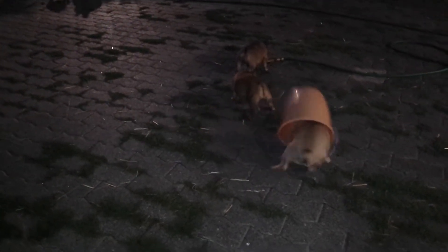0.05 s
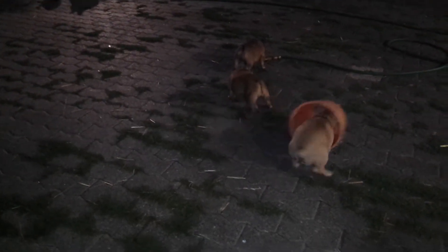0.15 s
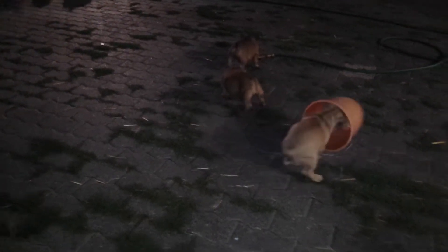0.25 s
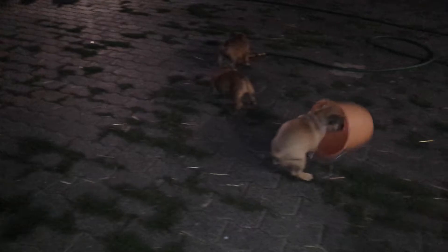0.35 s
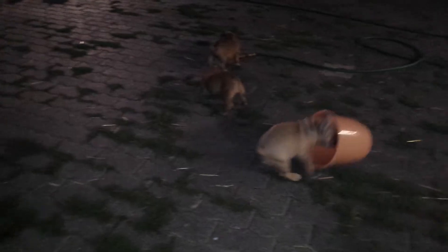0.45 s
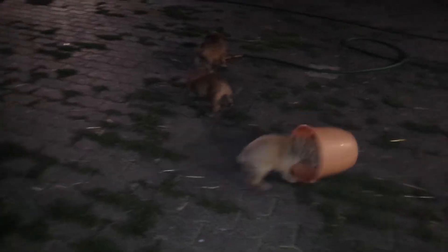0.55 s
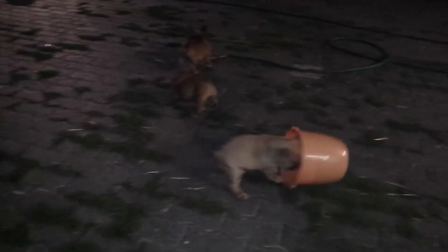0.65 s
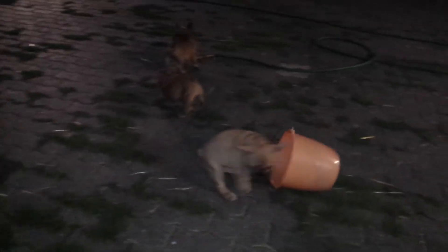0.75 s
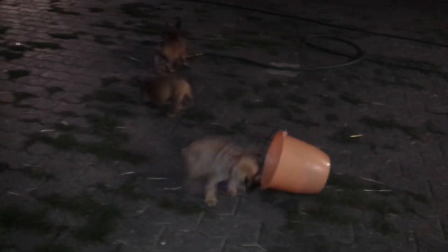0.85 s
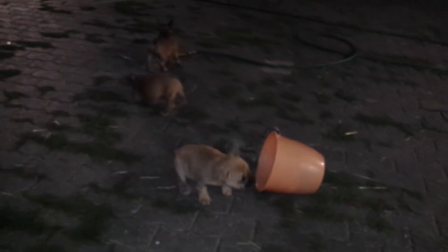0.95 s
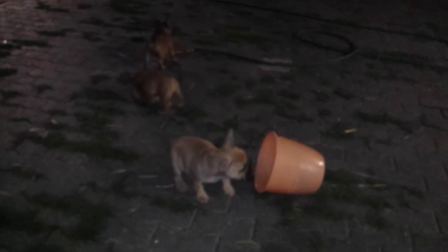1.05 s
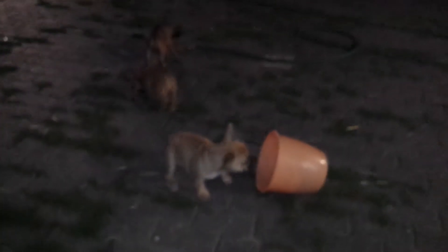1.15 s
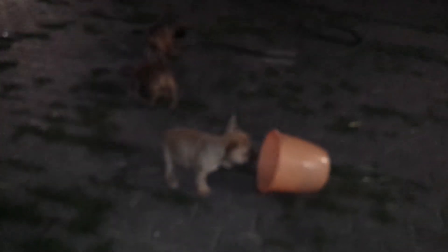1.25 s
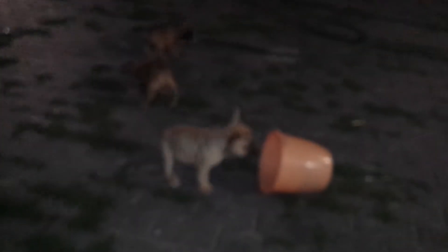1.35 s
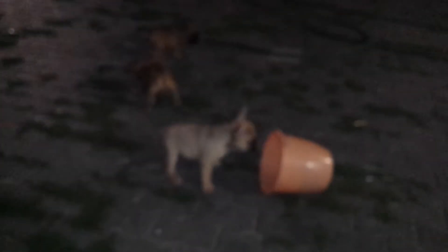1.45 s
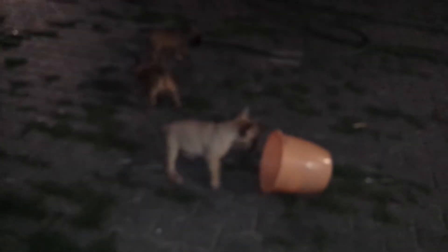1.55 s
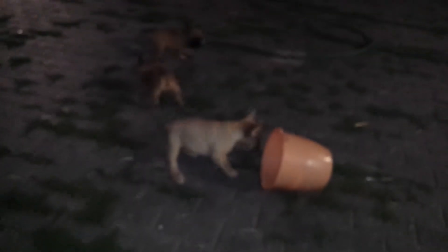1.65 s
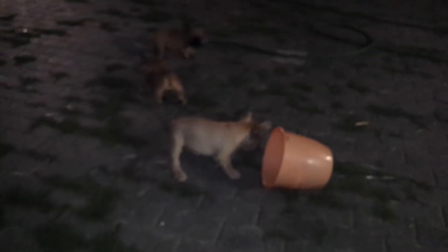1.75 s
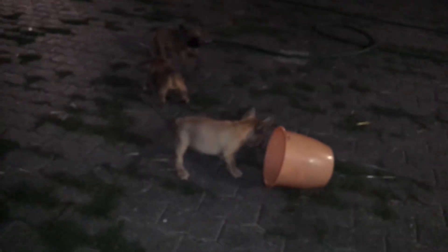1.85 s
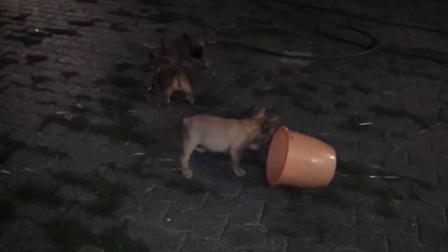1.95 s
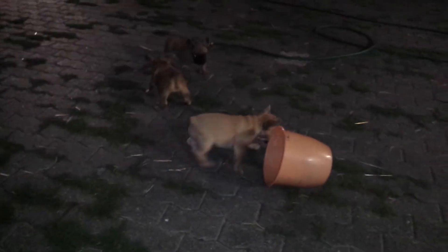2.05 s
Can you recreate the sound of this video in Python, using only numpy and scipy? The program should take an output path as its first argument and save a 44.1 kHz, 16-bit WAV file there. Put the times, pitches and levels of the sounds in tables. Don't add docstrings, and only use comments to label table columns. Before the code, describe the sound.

Plastic pot clattering on paving in a quiet night yard: hollow thumps and hard rattling knocks first, a brief scrape, a pause, a small tap and rocking, then faint paw scuffs over hum and hiss.

```python
import sys
import numpy as np
from scipy import signal
from scipy.fft import rfft, irfft
from scipy.io import wavfile

SR = 44100
rng = np.random.default_rng(int(sys.argv[2]) if len(sys.argv) > 2 else 0)


def how_loud(loudness_db):
    steps = np.asarray(loudness_db, float) / 20
    return 10 ** steps


def bounce(signal):
    frames = np.transpose(np.atleast_2d(signal))
    limited = np.clip(frames, -1, 1)
    pcm = np.round(limited * 32767).astype(np.int16)
    wavfile.write(sys.argv[1], SR, pcm)


N = 92610


def evened(x):
    return x / np.sqrt(np.mean(x ** 2) + 1e-20)


def unit(h):
    return h / np.linalg.norm(h)


def read(points, hz):
    f, value = np.transpose(points)
    return np.interp(np.log(hz + 1), np.log(f + 1), value)


def add(mix, start_s, sound):
    part = mix[round(start_s * SR):][:len(sound)]
    part += sound[:len(part)]


def colour(points):
    log_gain = read(points, np.fft.rfftfreq(2048, 1 / SR)) * np.log(10) / 20
    fold = np.r_[1, 2 * np.ones(1023), 1, np.zeros(1023)]
    cepstrum = irfft(log_gain) * fold
    return irfft(np.exp(rfft(cepstrum)))[:1024]


def ring(modes, tune=1, vary_db=0):
    t = np.arange(6000) / SR
    hz, db, t60_s = np.transpose(modes)[:, :, None]
    decay = how_loud(db + vary_db - 60 * t / t60_s)
    return (decay * np.sin(2 * np.pi * hz * tune * t)).sum(0)


def grit(count, per_s, spread_db):
    chance, side, size = rng.random((count, 3)).T
    height = how_loud(-spread_db * np.log(size + 0.0011))
    return evened((chance < per_s / SR) * np.sign(side - .5) * height)


# start in seconds, boom in dB, upper hollow modes in dB re boom,
# t60 in seconds, dull thud in dB.
LANDINGS = [(0.146, -26, -8.5, 0.26, -41), (0.2376, -1.5, -8, 0.15, -37), (0.299, -17.5, -4, 0.087, -42),
            (.349, -26, -2.5, 0.12, -38), (0.409, -28, -8, 0.07, -50), (0.438, -33.5, -4, 0.099, -42),
            (0.488, -6, -6, 0.17, -15), (0.517, -27, -8, 0.53, -32), (0.5787, -11, -5.5, 0.095, -4.5),
            (0.655, -26, 0, 0.19, -27), (.76, -28.5, -4, 0.084, -26), (0.726, -45.5, 8, 0.1, -26),
            (1.487, -34.5, -3, 0.096, -26)]
# frequency in Hz, level in dB, share of the landing's t60.
HOLLOW_MODES = [(202, 0, 1.0), (345, -6, 1.1), (390, 0, .95), (300, -13, .6), (160, -16, .5),
                (246, -13, .6)]
LOW_RISE_S, HIGH_RISE_S = 0.003, 0.0036
THUD_HZ, THUD_T60_S = 190, 0.023
CHOKE_S, CHOKE_DB_PER_S = .055, 600


def booms():
    out = np.zeros(N)
    t = np.arange(6000) / SR
    choke = how_loud(-CHOKE_DB_PER_S * np.maximum(t - CHOKE_S, 0))
    thud = np.convolve(ring([(THUD_HZ, 0, THUD_T60_S)]), np.hanning(70) / 35)
    for start_s, boom_db, upper_db, t60_s, thud_db in LANDINGS:
        modes = [(hz, db, t60_s * share) for hz, db, share in HOLLOW_MODES]
        low = ring([mode for mode in modes if mode[0] <= 280])
        high = ring([mode for mode in modes if mode[0] > 280])
        add(out, start_s, how_loud(boom_db) * choke * (1 - np.exp(-t / LOW_RISE_S)) * low)
        add(out, start_s, how_loud(boom_db + upper_db) * choke * (1 - np.exp(-t / HIGH_RISE_S)) * high)
        add(out, start_s, how_loud(thud_db) * thud)
    return out


# start in seconds, wall in dB, tick in dB, chatter length in seconds,
# brightest wall frequency in Hz.
CONTACTS = [(.124, -26, -25.5, 0.0063, 900), (.1275, -19.5, -47, 0.0028, 2480),
            (0.144, -25, -29, 0.0077, 2350), (0.152, -27, -48, 0.0058, 1120),
            (.167, -20, -61, 0.0052, 2380), (0.185, -42, -34, .006, 1000), (.202, -30, -48, 0.0089, 2200),
            (.2375, -21, -23, 0.0073, 1420), (0.265, -59, -33.5, 0.02, 800),
            (0.358, -27.5, -28, 0.0049, 1680), (0.402, -38, -44, 0.0073, 1120),
            (0.435, -40.5, -45, 0.006, 700), (0.4892, -13.5, -17, 0.0068, 1710),
            (0.511, -32, -40, 0.041, 2200), (.519, -25.5, -29.5, 0.03, 1000),
            (0.563, -24, -38, 0.0083, 1200), (0.5758, -30, -16, 0.0056, 2900),
            (0.6026, -21.5, -17.5, 0.013, 1510), (.607, -25, -35.5, 0.0062, 1110),
            (0.616, -42, -43, 0.0037, 900), (.639, -24, -48, 0.013, 1510), (.658, -27, -40, 0.012, 1170),
            (0.743, -34, -43, 0.0029, 1060), (.75, -24, -32.5, 0.0057, 1220),
            (0.76, -21, -24, 0.0083, 1000), (0.801, -24, -49, 0.0048, 850), (0.806, -28, -55, 0.0048, 1000),
            (0.8174, -19, -27.5, 0.0074, 1120), (0.821, -16, -37, 0.0022, 900),
            (.833, -33, -34, 0.011, 1330), (1.403, -49, -67, 0.0055, 895),
            (1.4878, -27.5, -31, 0.0091, 1270), (1.508, -38, -39, .006, 1500)]
# frequency in Hz, level in dB, t60 in seconds.
WALL_MODES = [(660, -4, .04), (755, 0, .05), (860, -2, .04), (1000, -1, .04), (1150, -1, .045),
              (1530, -1, .035), (1640, -1, .035), (1860, -4, .03), (2340, -5, .05), (2560, -7, .025),
              (3220, -10, .02), (3950, -15, .02), (5000, -13, .015)]
# frequency in Hz, level in dB.
TICK_SPECTRUM = [(800, -43.5), (2300, 13.5), (3300, 12), (4300, 6.5), (5500, 3.5), (9000, -1), (13000, -9),
                 (16500, -14.5)]
FOCUS_DB = 7


def wall_patch(tune_spread, focus_db=0):
    shape = (len(WALL_MODES), 1)
    tune = 1 + tune_spread * rng.standard_normal(shape)
    return unit(ring(WALL_MODES, tune, focus_db + 2 * rng.standard_normal(shape)))


def knocks():
    out = np.zeros(N)
    t = np.arange(2000) / SR
    tick = unit(colour(TICK_SPECTRUM))
    mode_hz = np.transpose(WALL_MODES)[0][:, None]
    for start_s, wall_db, tick_db, length_s, bright_hz in CONTACTS:
        clicks = grit(2000, 9000, 1.0) * .7 + 3 * (t == 0)
        chatter = clicks * np.exp(-(t / length_s) ** 2 * 1.5)
        patch = wall_patch(.015, -FOCUS_DB * np.log2(mode_hz / bright_hz) ** 2)
        add(out, start_s, how_loud(wall_db) * signal.fftconvolve(chatter, patch))
        add(out, start_s, how_loud(tick_db) * signal.fftconvolve(chatter * np.exp(-t / 0.023), tick))
    return out


# start in seconds, peak in dB,
# pitch in Hz, t60 in seconds.
CLEAR_RINGS = [(.125, -17.5, 655, 0.024), (.128, -26, 1000, 0.037), (.15, -27.5, 1030, 0.037),
               (.168, -27, 1016, .06), (.19, -33, 1068, .12), (.3, -41, 1144, 0.19),
               (.4, -29.5, 1110, 0.037), (.4895, -15, 734, 0.038), (.4895, -11.5, 1201, 0.029),
               (.4895, -27, 1680, 0.014), (0.4889, -15.5, 1880, .03), (.52, -31, 825, 0.19),
               (.525, -41, 2410, 0.11), (.602, -15.5, 1573, 0.034), (.606, -17.5, 1027, 0.041),
               (.611, -39, 736, 0.034), (.761, -11.5, 1230, 0.02), (.761, -29, 708, 0.064),
               (.771, -19, 1120, 0.054), (.797, -30, 910, .03), (.808, -17, 1160, 0.027),
               (.808, -28, 685, 0.027), (.818, -16.5, 825, 0.028), (.823, -21, 834, 0.05),
               (.829, -16.5, 1050, 0.032), (.883, -52, 1070, 0.036), (1.4908, -22, 690, 0.019),
               (1.49, -22, 1140, 0.023), (1.501, -41, 840, 0.021), (1.488, -30.5, 2460, 0.028),
               (1.49, -29, 520, 0.025), (0.656, -17.5, 318, 0.063), (0.852, -41.5, 449, 0.28),
               (0.241, -20, 1142, 0.028), (0.245, -18, 2340, 0.023), (1.506, -51, 1690, 0.036),
               (1.545, -38.5, 676, 0.04), (1.545, -42.5, 1164, .06), (1.565, -47, 610, 0.024)]
RING_RISE_S = 0.0011


def rings():
    out = np.zeros(N)
    swell = 1 - np.exp(-np.arange(6000) / SR / RING_RISE_S)
    for start_s, db, hz, t60_s in CLEAR_RINGS:
        add(out, start_s, swell * ring([(hz, db, t60_s)]))
    return out


# time in seconds, level in dB, rim squeal in Hz.
DRAG_PATH = [(0, -40.5, 1170), (0.047, -49.5, 1190), (.118, -57.5, 1000), (0.149, -39, 1000),
             (0.222, -47, 1210), (0.271, -36, 1200), (0.34, -50, 1240), (0.473, -59.5, 1120),
             (.52, -48, 1310), (0.643, -36, 1500), (0.719, -47.5, 710), (.79, -37.5, 766), (.825, -31, 880),
             (0.85, -40.5, 1200), (.95, -51.5, 1000), (1.05, -66, 950), (1.2, -84, 710)]
SETTLE_S, SETTLE_DB, SETTLE_T60_S = 1.495, -39, .37
SETTLE_HZ = 1000
GRIT_PER_S, GRIT_SPREAD_DB = 5000, 2
GRIT_TICK_DB, GRIT_BOOM_DB = -5, -5.5
SQUEAL_DB, SQUEAL_WIDTH_HZ = -6.5, 430


def squeal(t):
    at_s, _, hz = np.transpose(DRAG_PATH)
    turn = np.exp(2j * np.pi * np.cumsum(np.interp(t, at_s, hz)) / SR)
    r = np.exp(-np.pi * SQUEAL_WIDTH_HZ / SR)
    slips = signal.lfilter([1], [1, -2 * r, r * r], grit(N, 600, 4) / turn)
    return evened((slips * turn).real)


def drag():
    t, out = np.arange(N) / SR, np.zeros(N)
    at_s, db, _ = np.transpose(DRAG_PATH)
    rocking = (t > SETTLE_S) * how_loud(SETTLE_DB - 60 * abs(t - SETTLE_S) / SETTLE_T60_S)
    level = how_loud(np.interp(t, at_s, db)) + rocking
    hollow = unit(ring([(hz, mode_db, 0.028 * share) for hz, mode_db, share in HOLLOW_MODES]))
    for _ in range(6):
        body = wall_patch(.03) + how_loud(GRIT_BOOM_DB) * hollow
        add(body, 0, how_loud(GRIT_TICK_DB) * unit(colour(TICK_SPECTRUM)))
        kicks = level * grit(N, GRIT_PER_S / 6, GRIT_SPREAD_DB)
        out += .4 * signal.fftconvolve(kicks, body)[:N]
    out = out + how_loud(SQUEAL_DB) * level * squeal(t)
    soft = signal.lfilter(*signal.butter(1, SETTLE_HZ, fs=SR), out)
    return np.where(t > SETTLE_S, soft, out)


# start in seconds, length in seconds, level in dB, centre
# in Hz, width in octaves.
PAW_SCUFFS = [(0.09, 0.0037, -42.5, 5760, 2), (.132, 0.0025, -34.5, 7500, 0.19),
              (0.4327, 0.0052, -40.5, 9400, 0.83), (0.435, 0.02, -42.5, 12400, 0.19),
              (1.149, 0.07, -57.5, 8800, 0.7), (1.238, 0.0026, -35.5, 11100, 0.99),
              (1.523, 0.02, -52.5, 7950, 2.6), (0.6, 0.022, -53, 6500, 0.52),
              (0.633, 0.0094, -37, 4630, 0.13), (0.619, 0.029, -47, 6500, 1.5),
              (1.83, 0.011, -51, 4500, 0.21), (1.832, 0.045, -53.5, 2470, 0.5),
              (1.841, 0.012, -50.5, 4030, 0.61), (1.853, 0.019, -46.5, 4030, 0.47),
              (1.866, .004, -43, 4970, 1.4), (1.875, 0.011, -51, 3800, 0.46), (1.95, 0.053, -49, 9050, 1.8)]


def scuffs():
    out = np.zeros(N)
    for start_s, length_s, db, hz, octaves in PAW_SCUFFS:
        u = np.arange(6000) / SR / length_s
        stroke = np.clip(u / 0.037, 0, 1) * np.clip((1 - u) / 0.24, 0, 1)
        band = [(hz * 2 ** (k * octaves), -6 * k * k) for k in range(-3, 4)]
        crackle = signal.fftconvolve(stroke * grit(6000, 5000, 3.8), unit(colour(band)))
        add(out, start_s, how_loud(db) * crackle)
    return out


# frequency in Hz, t60 in seconds.
YARD_T60 = [(200, 0.47), (1000, 0.33), (3000, 0.64), (8000, 0.57)]
YARD_DB = -10


def yard(x):
    taps = np.zeros((2, 20000))
    at = np.arange(120, 19980, 20) + rng.integers(0, 20, (2, 993))
    np.put_along_axis(taps, at, rng.choice([-1., 1.], at.shape), 1)
    hz, t, z = signal.stft(taps, SR, nperseg=256)
    decay = how_loud(-60 * t / read(YARD_T60, hz)[:, None])
    tail = signal.istft(z * decay, SR, nperseg=256)[1]
    return signal.fftconvolve(x[None], tail / np.linalg.norm(tail[0]), axes=1)[:, :N]


# frequency in Hz, rms level in dB, width in Hz.
HUM_LINES = [(169.6, -48, .6), (339.2, -67, 2), (113, -60, 3), (91, -64, 6)]
# frequency in Hz, level in dB.
AIR_SPECTRUM = [(20, -21), (55, -13), (130, -7.5), (300, -18), (1000, -26.5), (3000, -30.5), (8000, -28),
                (16000, -35)]
# frequency in Hz, likeness 0 to 1.
AIR_LIKENESS = [(100, 0.8), (500, 0.28), (1500, 0.12), (4000, 0.055)]
AIR_DB = -53.5


def night():
    hz = np.fft.rfftfreq(N, 1 / SR)
    a, b = rfft(rng.standard_normal((2, N)))
    same = np.clip(read(AIR_LIKENESS, hz), 0, 1)
    pair = np.array([same * a + np.sqrt(1 - same ** 2) * b, a])
    out = how_loud(AIR_DB) * evened(irfft(pair * how_loud(read(AIR_SPECTRUM, hz)), N))
    for f, db, width_hz in HUM_LINES:
        pole = np.exp(-np.pi * width_hz / SR)
        slow = signal.lfilter([1], [1, -pole], rng.standard_normal((2, N)))
        wobble = 1 + .12 * width_hz * (evened(slow[0]) + 1j * evened(slow[1]))
        carrier = np.exp(2j * np.pi * f * np.arange(N) / SR)
        out = out + how_loud(db) * evened((wobble * carrier).real)
    return out


SMALL_HZ = 108


def scene():
    hard = knocks() + rings() + drag() + scuffs()
    boom = booms()
    pot = hard + boom + how_loud(YARD_DB) * yard(hard + 0.67 * boom)
    no_bass = signal.butter(2, SMALL_HZ, "high", fs=SR, output="sos")
    return signal.sosfilt(no_bass, pot) + night()


def top_cut(x):
    return signal.sosfilt(signal.butter(12, 16530, fs=SR, output="sos"), x)


# frequency in Hz, level in dB.
LEFT_SHADE = [(150, -1), (500, 0), (1000, -1), (2000, -7), (4000, -16), (6500, -38), (9000, -22),
              (13000, -16)]
PORT_HZ, PORT_WIDTH_HZ, PORT_DB = 6500, 1187, 10
SCATTER_HZ, SCATTER_T60_S, SCATTER = 900, .1, .95
HISS_DB, EDGE_HZ = -61.5, 15600


def record(dry):
    r, w = np.exp(-np.pi * PORT_WIDTH_HZ / SR), 2 * np.pi * PORT_HZ / SR
    port = signal.lfilter([1 - r, 0, r - 1], [1, -2 * r * np.cos(w), r * r], dry)
    left, right = dry + how_loud(PORT_DB) * port
    low = signal.filtfilt(*signal.butter(2, SCATTER_HZ, fs=SR), left)
    treble = left - low
    corners = unit(grit(4000, 3000, 0.3) * how_loud(-60 * np.arange(4000) / SR / SCATTER_T60_S))
    scattered = signal.fftconvolve(treble, corners)[:N]
    left = low + (1 - SCATTER) * treble + SCATTER * scattered
    left = signal.fftconvolve(left, colour(LEFT_SHADE))[5:N + 5]
    x = np.array([left, right]) + how_loud(HISS_DB) * rng.standard_normal((2, N))
    edge = signal.firwin2(201, [0, EDGE_HZ - 150, EDGE_HZ + 100, SR / 2], [1, 1, .06, .04], fs=SR)
    return top_cut(signal.oaconvolve(x, edge[None], "same"))


dry = scene()
out = record(dry)
bounce(out)
```